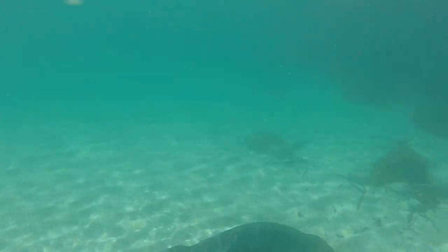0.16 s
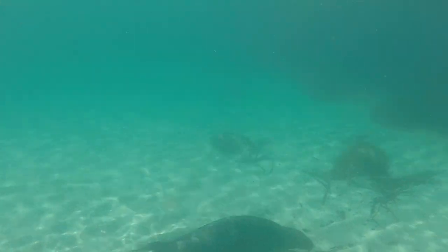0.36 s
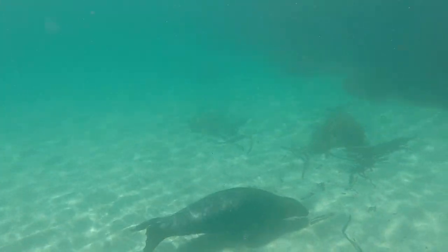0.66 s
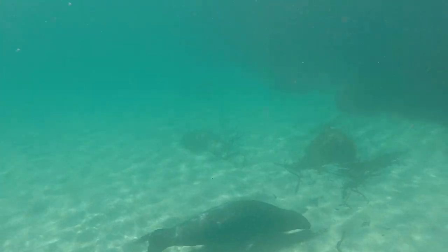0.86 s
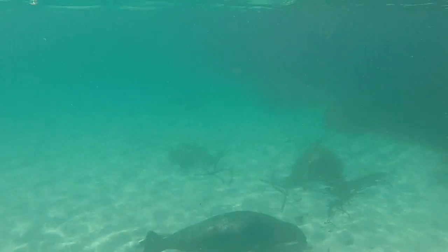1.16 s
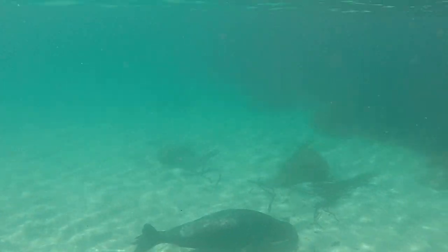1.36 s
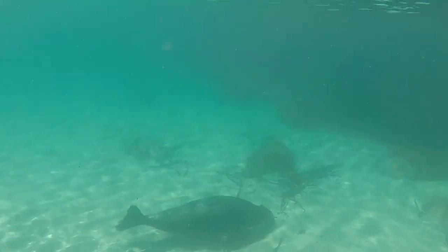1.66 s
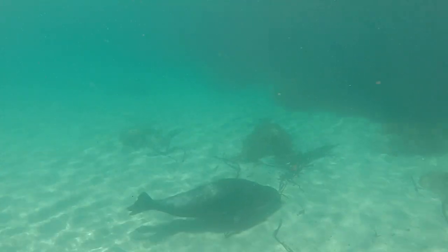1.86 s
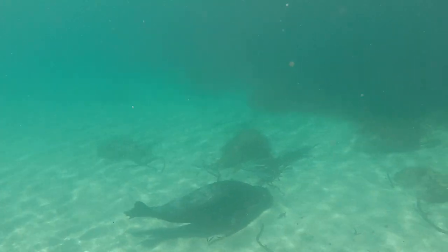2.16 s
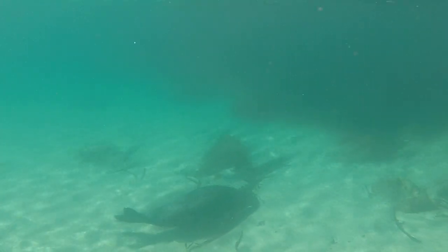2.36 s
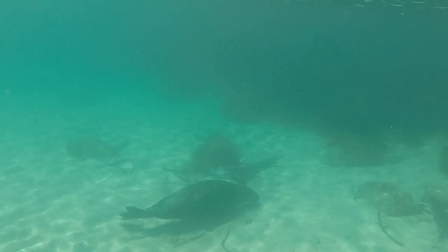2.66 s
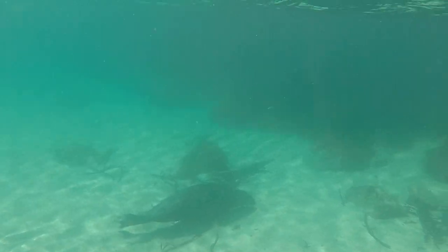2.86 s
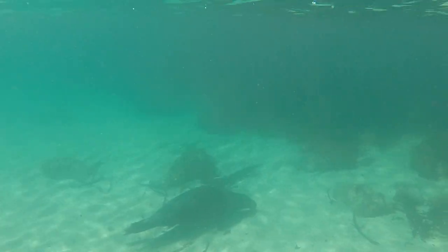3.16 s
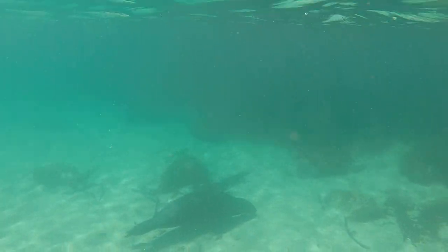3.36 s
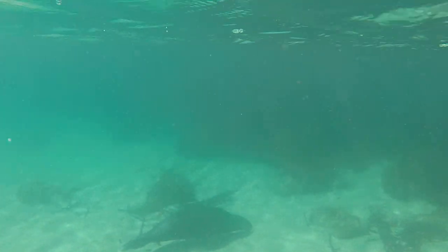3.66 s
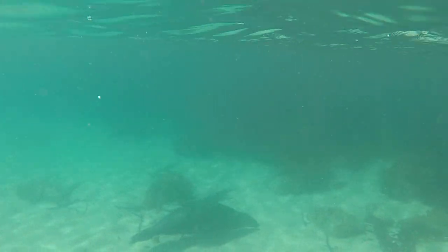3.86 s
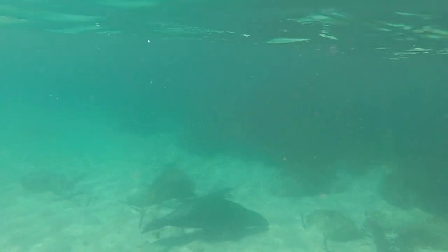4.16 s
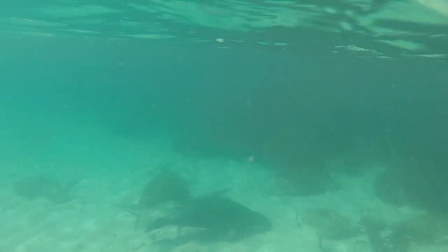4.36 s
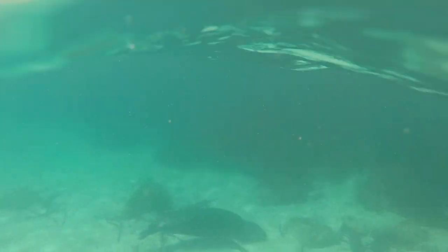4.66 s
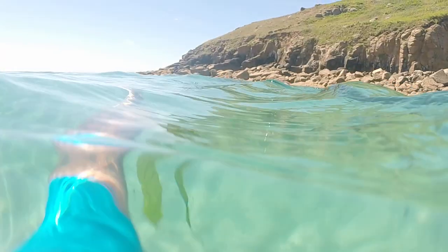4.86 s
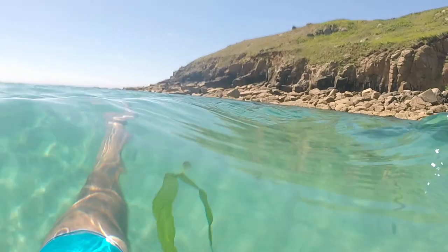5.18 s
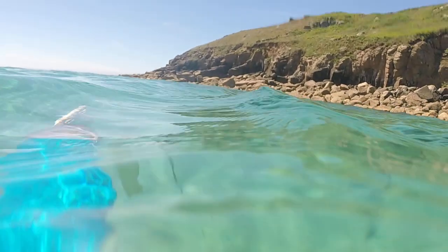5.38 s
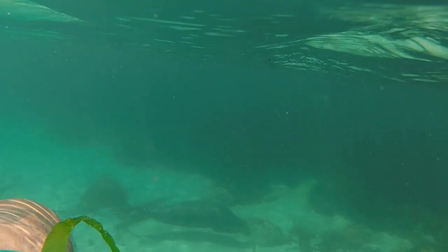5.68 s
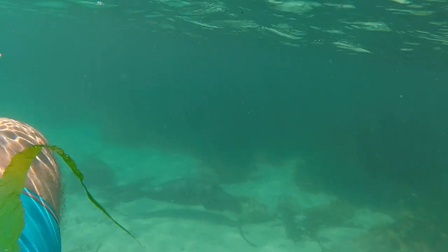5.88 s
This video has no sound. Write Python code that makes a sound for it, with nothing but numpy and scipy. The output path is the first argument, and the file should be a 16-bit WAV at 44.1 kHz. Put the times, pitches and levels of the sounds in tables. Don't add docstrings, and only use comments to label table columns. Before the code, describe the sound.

Heard from inside a hollow housing underwater: close, dry, hard-edged taps with very short plastic ringing over a quiet lumpy rumble and steady thin hiss. Loud clicks cluster near the start, a lone knock and a bright snap follow, another loud cluster lands past the middle, then mostly faint contacts until fingers knock and shove the shell in a crowded closing rattle with small bubbly pings.

```python
import sys
import numpy as np
from scipy import signal
from scipy.io import wavfile

SR = 44100
rng = np.random.default_rng(int(sys.argv[2]) if len(sys.argv) > 2 else 0)


def master_out(mix):
    frames = np.transpose(np.atleast_2d(mix))
    ceiling = np.clip(frames, -1, 1)
    pcm = np.round(ceiling * 32767).astype(np.int16)
    wavfile.write(sys.argv[1], SR, pcm)


def makeup_ratio(level_db):
    decades = np.asarray(level_db, float) / 20
    return 10 ** decades


N = 265631

# start_s (middle of the dip), level_db, push_ms, back_db (swing back)
SHOVES = [(0.3538, -29, 9.7, -6), (0.3803, -34, 2.2, 1), (0.422, -36, 3.3, -8), (1.6857, -27.5, 3.8, -11),
          (3.4077, -42.5, 2.54, 5.5), (4.8546, -32, 1.9, -18), (4.868, -39.5, 3.1, -20.5),
          (5.4667, -38, 2.6, -12.5), (5.492, -29, 2.6, -15), (5.552, -20.5, 2.5, -26),
          (5.6333, -16, 1.74, -27), (5.6805, -24.5, 3.3, -18), (5.8132, -23, 4.3, -2),
          (5.833, -28, 1.5, -14), (5.891, -21, 3.1, -23)]


def rms_one(x):
    return x / np.sqrt(np.mean(x ** 2) + 1e-20)


def peak_one(x):
    return x / np.abs(x).max()


def band(x, low_hz, high_hz):
    return signal.sosfilt(signal.butter(2, [low_hz, high_hz], "band", fs=SR, output="sos"), x)


def add(out, start_s, sound):
    at = round(start_s * SR)
    out[at:at + len(sound)] += sound[:N - at]


def drift(rate_hz):
    r = np.exp(-80 * np.pi * rate_hz / SR)
    slow = signal.lfilter([1], [1, -2 * r, r * r], rng.standard_normal(N // 40 + 2002))[2000:]
    return np.interp(np.arange(N) / 40, np.arange(len(slow)), rms_one(slow))


def ring(force, pitch_hz, t60_s):
    r = makeup_ratio(-60 / (t60_s * SR))
    w = 2 * np.pi * pitch_hz / SR
    return signal.lfilter([0, np.sin(w)], [1, -2 * r * np.cos(w), r * r], force)


def water():
    # pitch_hz, level_db (per Hz)
    floor = [(22, 5), (56, -10), (218, -17), (600, -22), (1200, -27.5), (3160, -32.5), (13800, -51.5),
             (15000, -52)]
    # start_s, level_db
    surge = [
        (0.0, -60),
        (0.5, -56),
        (1.68, -58.5),
        (3.22, -57.5),
        (5.33, -60.5),
        (5.75, -56),
        (6.02, -53.5),
    ]
    out = 0
    edges = 22 * 2 ** np.arange(0, 9.6, .5)
    white = rng.standard_normal((2, N + SR))
    together = drift(12.0)
    surge_db = np.interp(np.arange(N) / SR, *np.transpose(surge))
    surge_db = surge_db - surge_db.mean()
    hz_points, db_points = np.transpose(floor)
    for k, (low_hz, high_hz) in enumerate(zip(edges, edges[1:])):
        noise = band(white[k % 2], low_hz, high_hz)[SR:]
        hz = np.sqrt(low_hz * high_hz)
        watery = 1 / (1 + (hz / 300) ** 1.8)
        lumps_db = watery * (surge_db + 2.0 * together + 4.42 * drift(6.7)) + 0.12 * drift(14.0)
        level_db = np.interp(np.log(hz), np.log(hz_points), db_points)
        out = out + makeup_ratio(level_db + lumps_db) * noise
    out = signal.lfilter(*signal.butter(1, 45, "high", fs=SR), out)
    hiss_edge = signal.cheby2(10, 50, 15700, fs=SR, output="sos")
    return makeup_ratio(-53) * rms_one(signal.sosfilt(hiss_edge, out))


def shell(contact):
    # pitch_hz, level_db, t60_s
    modes = [(750, -28.5, 0.027), (1790, -26, .027), (2420, -28, 0.02), (2900, -33, 0.027),
             (4550, -39, 0.013), (5700, -29.5, 0.017)]
    return sum(makeup_ratio(level_db) * ring(contact, hz, t60_s) for hz, level_db, t60_s in modes)


def thumps():
    out, t = np.zeros(N), np.arange(2000) / SR
    for start_s, level_db, push_ms, back_db in SHOVES:
        push_s = push_ms / 1000
        dip = np.sin(np.pi * np.clip(t / push_s, 0, 1)) ** 2
        after = np.clip(t - 0.7 * push_s, 0, None)
        swing = np.cos(2 * np.pi * 28 * after)
        back = peak_one((1 - np.exp(-after / 0.0017)) * np.exp(-after / 0.011) * swing)
        add(out, start_s - push_s / 2, makeup_ratio(level_db) * (makeup_ratio(back_db) * back - dip))
    return out


def snaps():
    # start_s, level_db (peak), low_hz, high_hz, direction (+1 or -1)
    touches = [(0.735, -36, 1100, 4000, -1), (1.6861, -24, 950, 1490, -1), (1.9254, -32, 900, 3200, 1),
               (1.9258, -34.5, 11500, 15000, 1), (2.0865, -33, 900, 3300, -1),
               (2.6077, -21.5, 10000, 15400, 1), (3.1306, -36, 1300, 4000, -1), (3.4, -49.5, 2000, 9000, 1),
               (3.4318, -52, 4000, 13000, 1), (3.8373, -43, 6000, 12000, 1), (4.3998, -37, 500, 1800, -1),
               (4.852, -36.5, 2000, 3800, -1), (4.867, -39, 2000, 2900, -1), (5.879, -29, 2500, 4500, 1),
               (5.917, -35, 2500, 8000, 1), (5.9425, -30, 3000, 6500, 1)]
    out, step = np.zeros(N), 1.0 * (np.arange(600) == 0)
    for start_s, level_db, low_hz, high_hz, direction in touches:
        sound = peak_one(band(step, low_hz, min(high_hz, 16000)))
        add(out, start_s, np.sign(direction) * makeup_ratio(level_db) * sound)
    return out


def strikes(rows, cycles, rough, broad_db, second_db, spread, lasting, longest, first=-1):
    out, t = np.zeros(N), np.arange(2600) / SR
    grit = rng.standard_normal((len(rows), 2, len(t)))
    for (start_s, level_db, hz, t60_s, *second), (slip, scatter) in zip(rows, grit):
        t60_s = np.clip(t60_s, .0015, longest)
        push = np.exp(-t * hz / cycles)
        force = (1 - rough) * np.cos(2 * np.pi * hz * t) + rough * slip
        sound = peak_one(ring(first * push * force, hz, t60_s))
        messy = 1 / (1 + (hz * t60_s / 30) ** 2)
        close_hz = hz * (1 + 0.13 * np.tanh(slip[-1]))
        sound = sound + messy * makeup_ratio(-8.5) * peak_one(ring(push * scatter, close_hz, 1.2 * t60_s))
        if second:
            second_ring = peak_one(ring(push * slip, second[0], .65 * t60_s))
            sound = sound + messy * makeup_ratio(second_db) * second_ring
        own_db = min(second[1], 12) if second else 0
        snap = first * 4.4 * (t == 0)
        fading = scatter * makeup_ratio(-60 * t / (0.00088 + lasting * t60_s))
        crack = band(snap + fading, hz / spread ** 1.3, min(hz * spread ** 0.85, 15500))
        sound = sound + makeup_ratio(broad_db + own_db) * messy * peak_one(crack)
        add(out, start_s, makeup_ratio(level_db) * peak_one(sound))
    return out


def partner(hz, crack_db, middle_hz, ratio):
    crisp = crack_db > -5.5
    return hz * ratio if hz < middle_hz and crisp else hz / ratio


def pings():
    # start_s, level_db (peak), pitch_hz, t60_s
    rows = [
        (3.4727, -31, 4480, .013),
        (5.518, -48, 3220, .009),
        (5.6126, -46, 4250, .007),
        (3.529, -52, 4510, .012),
        (1.6812, -45, 1810, .013),
        (5.6842, -45, 1715, .041),
        (5.7815, -47, 1640, .036),
        (5.7823, -51, 2890, .026),
    ]
    return strikes(rows, cycles=3.6, rough=.1, broad_db=-19.0, second_db=0, spread=1.6, lasting=.4, longest=.05)


def knocks():
    # start_s, level_db (peak), pitch_hz, t60_s
    rows = [(0.3547, -19, 790, 0.015), (0.38, -21.5, 750, 0.008), (0.4178, -38, 900, 0.017),
            (0.4187, -45, 640, 0.008), (0.4318, -28.5, 770, 0.021), (0.4629, -29.5, 770, 0.009),
            (0.6716, -36.5, 650, 0.021), (1.6855, -22.5, 823, 0.019), (3.4064, -39.5, 655, 0.022),
            (3.4289, -31.5, 677, 0.018), (3.4508, -17.5, 712, 0.018), (3.4714, -42.5, 683, 0.026),
            (4.8512, -29.5, 860, 0.019), (4.8651, -28, 915, 0.013), (5.4637, -34.5, 850, 0.019),
            (5.489, -28, 990, 0.021), (5.5499, -27.5, 890, 0.013), (5.6309, -18, 882, 0.022),
            (5.6771, -23, 677, 0.024), (5.7901, -36, 710, 0.024), (5.8069, -30, 710, 0.082),
            (5.8127, -18, 695, 0.022), (5.8164, -29, 680, 0.028), (5.831, -31, 715, 0.183),
            (5.8427, -28, 680, 0.027), (5.8774, -37, 816, 0.137), (5.8874, -17, 650, 0.023),
            (5.9229, -23.5, 850, 0.013), (5.9281, -37, 680, 0.02), (5.9462, -32.5, 650, 0.018)]
    return strikes(rows, cycles=.4, rough=0.7, broad_db=0.0, second_db=0, spread=2.2, lasting=0.64,
                   longest=.021, first=1)


def ticks():
    # start_s, level_db (peak), pitch_hz, crack_db
    drifting = [(0.3587, -30.5, 9200, -4.5), (0.3803, -21, 4040, 11.5), (0.4112, -38, 6440, 3),
                (0.42, -15.5, 3800, -11), (0.4233, -38, 6270, 1.5), (0.4268, -32, 7600, 11),
                (0.506, -30, 4930, 9), (0.5135, -11, 9250, -4), (0.5206, -9.5, 8160, -19.5),
                (0.5214, -14.5, 7960, -1), (0.6717, -21.5, 6670, -6.5), (1.6873, -22, 3700, 1),
                (1.7332, -34.5, 13000, 0), (1.7349, -22, 7900, 8), (1.9255, -27, 9940, -3),
                (2.0868, -31.5, 11500, 16), (2.6075, -12.5, 7700, 20), (3.1258, -33, 6000, 0),
                (3.131, -37.5, 5640, 1.5), (3.408, -25.5, 5430, 9), (3.449, -17.5, 4900, -5),
                (3.4518, -6.5, 7730, -13), (3.4534, -11.5, 9500, -12), (3.468, -9, 9600, 14),
                (3.4725, -36, 6000, 3)]
    # start_s, level_db (peak), pitch_hz, crack_db
    gripping = [(5.49, -39, 5540, 7), (5.55, -33.5, 6000, 0), (5.6313, -25.5, 4380, 7),
                (5.6782, -34, 6100, -3), (5.7649, -25, 5450, -24), (5.7761, -42, 13090, 0.5),
                (5.7894, -33, 12800, -5), (5.807, -15, 4660, 9), (5.8068, -20.5, 12400, -4),
                (5.8146, -13, 5170, -11), (5.8164, -23, 5630, 1), (5.8235, -37, 4550, 0.5),
                (5.8323, -23, 5470, -4), (5.8433, -10, 6300, -17), (5.845, -13, 4900, -20),
                (5.8492, -32, 7640, -1), (5.8786, -22, 6100, -18), (5.88, -29, 5400, -11),
                (5.8894, -31, 6050, -2), (5.9166, -30, 10000, -9), (5.9332, -14.5, 6850, -13),
                (5.9393, -23.5, 9700, -5), (5.9431, -24, 9000, -6), (5.9475, -24, 6800, 2)]
    # start_s, level_db (peak), pitch_hz
    faint = [(0.353, -45, 6000), (0.366, -44, 5580), (0.4324, -39, 4500), (0.6809, -45, 8500),
             (0.7186, -38, 9220), (1.05, -52, 7860), (1.1397, -46.5, 4640), (1.1476, -46, 5350),
             (1.2853, -45, 4400), (1.296, -41.5, 5160), (1.71, -50, 9480), (1.7705, -48.5, 4490),
             (3.5276, -45.5, 7010), (3.8376, -41.5, 7800), (4.111, -48, 4440), (4.4012, -40, 4400),
             (4.8516, -44, 9470), (5.0346, -48, 12000), (5.41, -48, 5090), (5.4379, -49, 5350),
             (5.4643, -41, 5730), (5.493, -42, 5700), (5.6467, -47, 11500), (5.7446, -47, 5070),
             (5.766, -45, 5800), (5.8526, -37, 4460), (5.8586, -35, 4730), (5.8912, -41, 5500)]
    rows = [(s, db, hz, 33 / hz, partner(hz, crack_db, 6600, 1.4), crack_db)
            for s, db, hz, crack_db in [*drifting, *gripping]]
    rows += [(s, db, hz, .003) for s, db, hz in faint]
    return strikes(rows, cycles=0.81, rough=.5, broad_db=7.0, second_db=-6.0, spread=1.9, lasting=0.94,
                   longest=0.0044)


def latch_chatter():
    after_s, gap_s, loss_db = .007, .004, 3
    return [(s + after_s + k * gap_s, db - 25 - k * loss_db, 1720, 0.0063)
            for s, db, *_ in SHOVES for k in range(3)]


def taps():
    # start_s, level_db (peak), pitch_hz, t60_s, crack_db
    drifting = [(0.3544, -4.5, 1836, 0.015, -2.5), (0.381, -1, 2650, 0.008, -13),
                (0.4188, -6.5, 3030, 0.0055, 0.5), (0.4227, -20, 2500, 0.0049, -3),
                (0.426, -29.5, 1730, 0.01, -0.5), (0.4325, -14, 2540, 0.0051, -20),
                (0.433, -11, 2820, 0.0088, -9), (0.5132, -18, 2900, 0.0078, 10.5),
                (0.5196, -20, 3190, 0.0045, 2), (0.671, -23.5, 1770, 0.0014, 16),
                (0.735, -27.5, 2505, 0.025, 6.5), (1.686, -12.5, 2420, 0.0026, 9),
                (1.7332, -25.5, 2550, 0.0032, -4.5), (1.735, -26.5, 3050, 0.01, 2),
                (2.6086, -24.5, 2740, 0.005, 10), (3.4072, -20.5, 2270, 0.0033, 3.5),
                (3.4488, -19, 1150, 0.023, 11), (3.4518, -1, 1750, 0.0036, -15.5),
                (3.453, -14.5, 1130, 0.0034, 12), (3.4676, -17, 2230, 0.006, 12),
                (3.4724, -19, 1900, 0.012, -13.5), (4.3996, -27.5, 3150, 0.012, 2),
                (4.8519, -25.5, 1790, 0.011, -7), (4.8664, -33.5, 1770, 0.0086, -22)]
    # start_s, level_db (peak), pitch_hz, t60_s, crack_db
    gripping = [(5.4644, -27, 1740, 0.006, -4), (5.4905, -23, 2560, 0.013, -5.5),
                (5.55, -18.5, 1780, 0.011, -2), (5.553, -31, 2000, 0.0066, -5),
                (5.6318, -17.5, 2550, 0.014, -1), (5.6793, -20.5, 1540, 0.0072, 14),
                (5.764, -27.5, 2320, 0.0047, -5), (5.8067, -20, 2500, 0.0089, 4),
                (5.8123, -16.5, 2260, 0.0024, 10), (5.814, -15, 3280, 0.0054, 1),
                (5.817, -24.5, 1540, 0.015, 11), (5.831, -27, 2390, 0.015, 18),
                (5.8435, -5.5, 2840, 0.0022, 2), (5.8781, -19.5, 2420, 0.0015, -2),
                (5.8792, -22, 2500, 0.011, -2), (5.888, -18, 1510, 0.016, 6),
                (5.916, -32, 2350, 0.0077, -3), (5.924, -9.5, 1610, 0.0078, -15),
                (5.9287, -23, 1230, 0.022, -5), (5.933, -18.5, 3000, 0.012, 9),
                (5.9411, -30, 1370, 0.0056, 5), (5.9421, -31, 2100, 0.0057, 1),
                (5.9473, -21, 2410, 0.0051, 16)]
    # start_s, level_db (peak), pitch_hz
    faint = [(0.3198, -46.5, 1660), (0.397, -34, 1740), (0.4117, -31, 2410), (0.462, -36, 1560),
             (0.5057, -34.5, 2800), (0.681, -44.5, 1740), (0.718, -33.5, 1800), (0.7252, -42.5, 1520),
             (1.14, -46.5, 2750), (1.148, -44.5, 2580), (1.296, -43, 2480), (1.925, -42, 1750),
             (5.6465, -45, 3100), (3.1257, -46, 2740), (3.1306, -35, 2900), (3.5276, -50, 2510),
             (3.7174, -50, 1720), (3.8371, -42, 2980), (3.8653, -44, 2870), (4.4217, -43.5, 3040),
             (4.9953, -43, 3170), (5.0345, -46, 3083), (5.223, -47.5, 3550), (5.41, -42, 2310),
             (5.4383, -45, 3390), (5.4747, -42, 1710), (5.7908, -35, 1180), (5.823, -34, 2500),
             (5.8535, -35, 2370), (5.9545, -39, 1480)]
    # start_s, level_db (peak), pitch_hz, t60_s
    bubbles = [
        (0.388, -39, 1750, 0.027),
        (3.4298, -34.5, 2800, 0.029),
        (5.6816, -30, 1720, 0.0075),
        (5.856, -41, 1670, 0.034),
        (5.967, -35.5, 1970, 0.016),
        (6.0106, -36, 2170, 0.033),
    ]
    rows = [(s, db, hz, t60_s, partner(hz, crack_db, 2000, 1.32), crack_db)
            for s, db, hz, t60_s, crack_db in [*drifting, *gripping]]
    rows += [(s, db, hz, 0.0063) for s, db, hz in faint]
    rows += [*bubbles, *latch_chatter()]
    return strikes(rows, cycles=0.78, rough=.3, broad_db=2.0, second_db=0.5, spread=1.8, lasting=1.0,
                   longest=.04)


def scene():
    hits = band(taps() + pings(), 750, 5070)
    hits = hits + band(ticks(), 2200, 13000)
    hits = hits + band(knocks(), 340, 1600)
    hits = hits + snaps()
    return (hits + makeup_ratio(-23.0) * shell(hits) + thumps() + water())[None]


def roll_off(x):
    return signal.sosfilt(signal.butter(12, 16590, fs=SR, output="sos"), x)


def record(dry):
    treble_cut = signal.cheby2(10, 60, 17300, fs=SR, output="sos")
    mix = signal.sosfilt(treble_cut, np.clip(dry, -1, 1))
    return roll_off(mix)


dry = scene()
out = record(dry)
master_out(out)
```